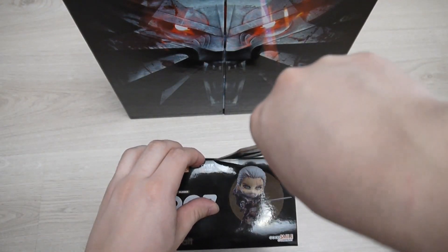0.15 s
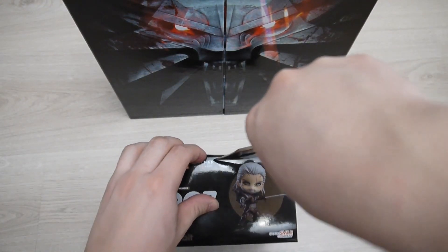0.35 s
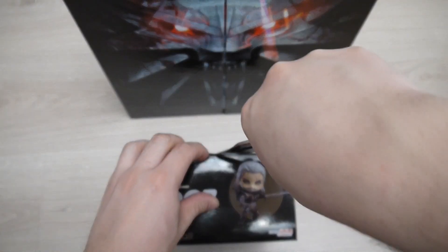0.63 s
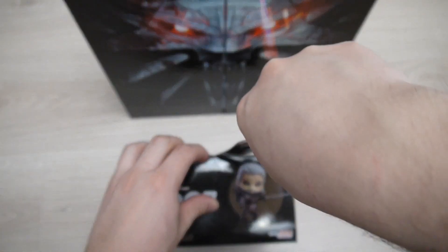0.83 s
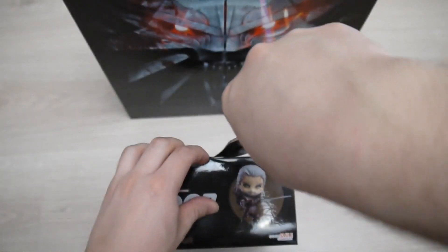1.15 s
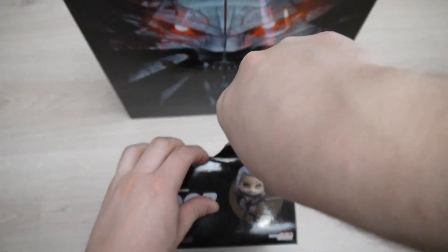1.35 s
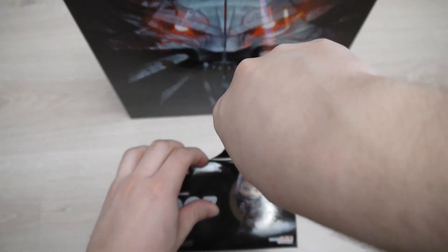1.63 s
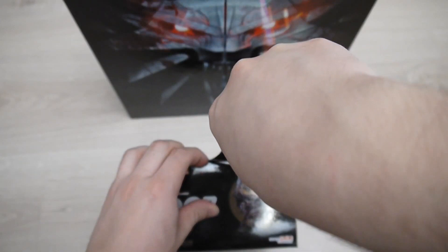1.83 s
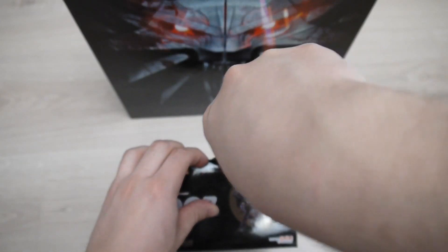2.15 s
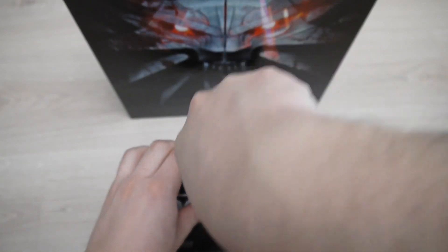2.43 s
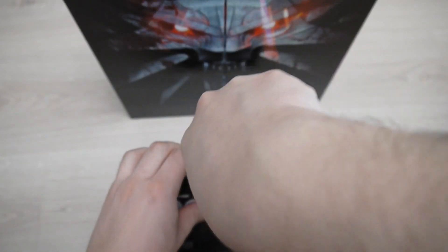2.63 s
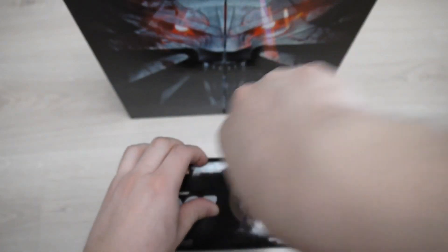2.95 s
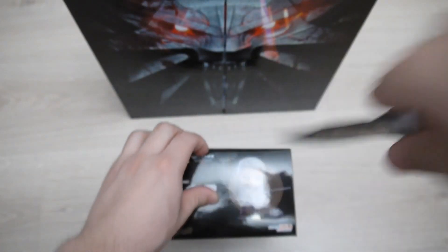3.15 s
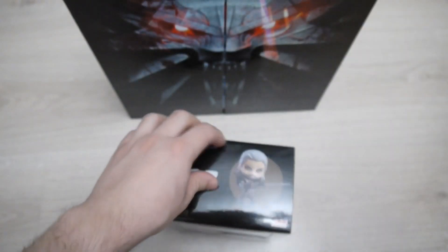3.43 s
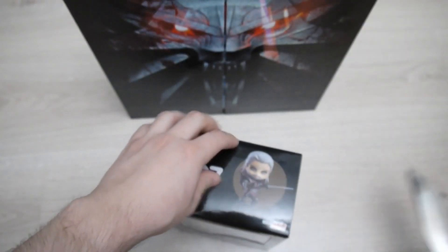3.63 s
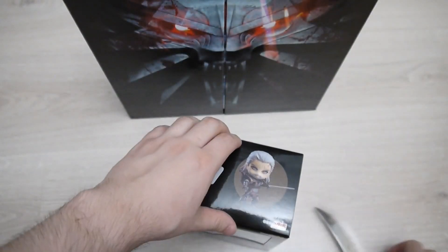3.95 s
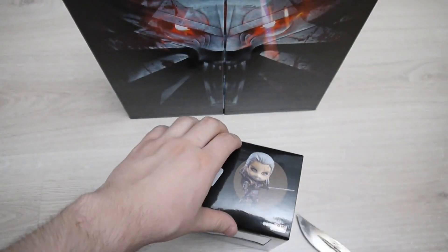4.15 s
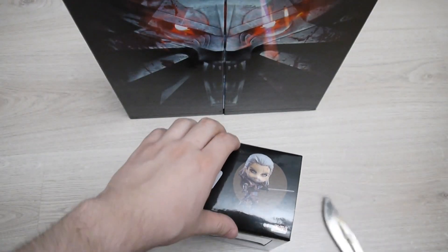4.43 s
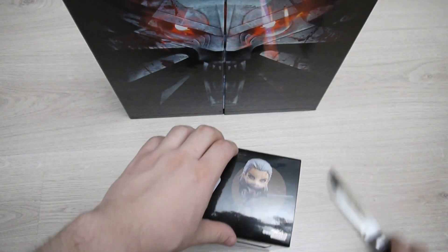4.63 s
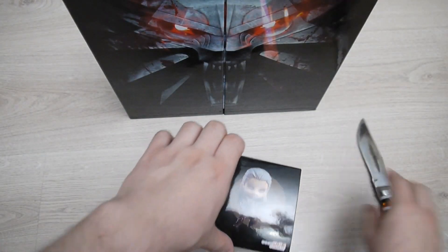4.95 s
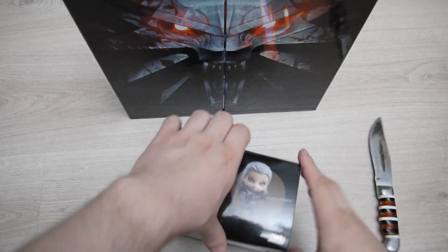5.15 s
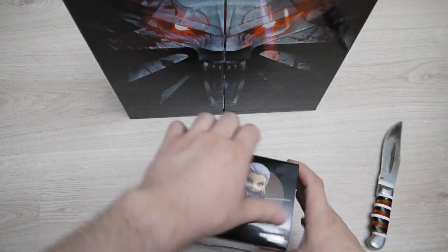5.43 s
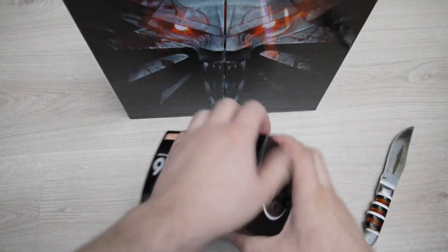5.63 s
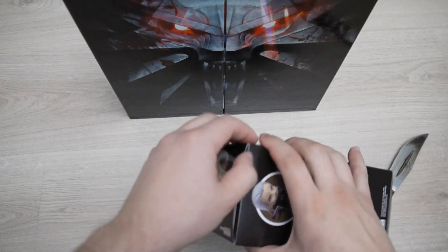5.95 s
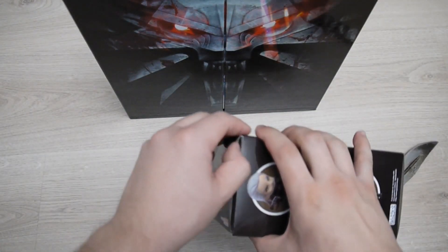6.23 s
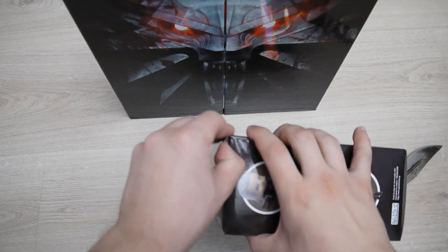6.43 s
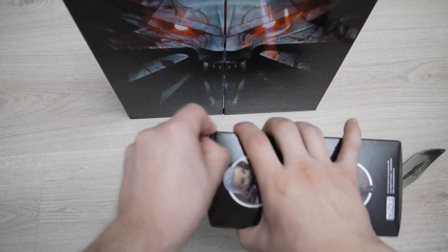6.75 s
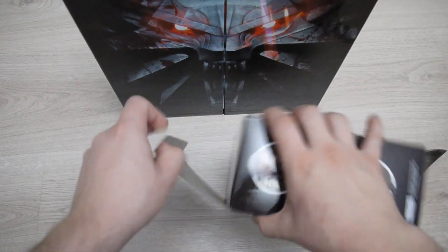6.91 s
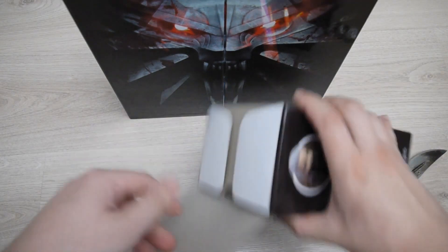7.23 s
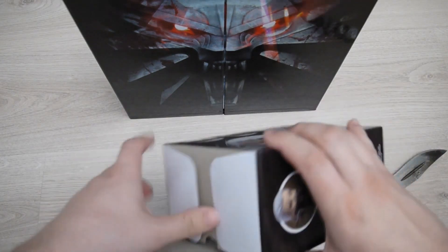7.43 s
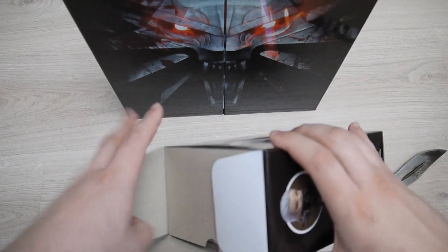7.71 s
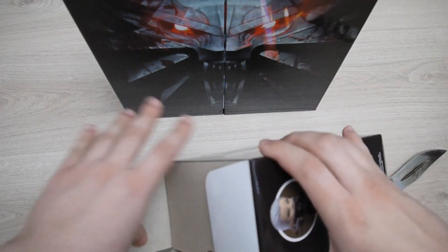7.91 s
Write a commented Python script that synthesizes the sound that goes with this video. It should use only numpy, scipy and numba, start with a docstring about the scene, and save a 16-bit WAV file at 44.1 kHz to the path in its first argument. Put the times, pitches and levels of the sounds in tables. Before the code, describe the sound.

A close stereo microphone at a table indoors, with soft steady room hush and short lively reflections. For the first two seconds there are only very faint card ticks. Around 2.4 s a crisp crackle comes from the box, then at 2.76 s a loud sharp snap as the seal gives way. Quiet card rubbing follows. From 3.75 s the knife is laid down: loud, hard wooden knocks with quick rebounds, a bright steel clink at 3.94, more rocking knocks to 4.2, weak dull bumps, then a clatter and juddering skid at 4.6-4.9 with another clink. From 5.1 to 6.6 s, light taps and papery rubs as the box is turned. At about 6.75-6.9 s the tuck flap pulls free in a loud, crackling pop. Until 8 s, hollow card taps, rasping strokes and brisk scrapes of inner flaps, strongest near 7.75.

```python
"""On a table indoors, close to a stereo microphone, a small cardboard box is opened with a knife.
The knife snaps through the seal, is laid down, rocks on its handle and is pushed aside.
Then hands turn the box, pull its tuck flap free and brush the inner flaps open.
Card and steel crackle as short bursts of noise, box, table and blade ring as decaying tones,
and rubbing is made of random tiny slips. Room echoes and a quiet hush surround it all."""
import sys
import numpy as np
from scipy import signal
from scipy.fft import rfft, irfft
from scipy.io import wavfile
from scipy.ndimage import uniform_filter1d
from numba import njit

SR = 44100
rng = np.random.default_rng(int(sys.argv[2]) if len(sys.argv) > 2 else 0)


def wav_out(sig):
    """Save sig, one row per channel (or a flat mono array), as 16-bit PCM at SR to the path in sys.argv[1]."""
    wavfile.write(sys.argv[1], SR, np.round(np.clip(np.atleast_2d(sig).T, -1, 1) * 32767).astype(np.int16))


N = 356328
TIME = np.arange(N) / SR
RING = TIME[:SR // 2]  # the half second that each blow, ring or echo may last


def amp(db):
    """Turn decibels into a gain."""
    return 10 ** (np.asarray(db) / 20)


def unit(x):
    """Scale a sound to an average (rms) strength of 1."""
    return x / np.sqrt(np.mean(x ** 2))


def lookup(points, hz):
    """Read between (f/Hz, value) points, with frequency on a logarithmic axis."""
    f, value = np.transpose(points)
    return np.interp(np.log(np.maximum(hz, 1)), np.log(f), value)


def band(x, hz, kind, order=2):
    """Keep only some of the frequencies (Butterworth filter)."""
    sections = signal.butter(order, np.minimum(hz, SR / 2 - 100), kind, fs=SR, output="sos")
    return signal.sosfilt(sections, x)


def through(x, response):
    """Let every sample of x set off the given response."""
    return signal.fftconvolve(x, response)[:len(x)]


def colour(x, points, size=2048):
    """Shape x with a (f/Hz, level/dB) spectrum, by a filter that never acts ahead of time."""
    hz = np.arange(size // 2 + 1) * SR / size
    cepstrum = irfft(np.log(amp(lookup(points, hz))))
    # folding the second half onto the first makes the filter minimum-phase
    cepstrum[1:size // 2] *= 2
    cepstrum[size // 2 + 1:] = 0
    return through(x, irfft(np.exp(rfft(cepstrum))))


def add(track, s, x):
    """Mix x into the track at time s."""
    i = int(s * SR)
    track[i:i + len(x)] += x[:N - i]


def ring(modes, stretch=1):
    """Sum of dying tones, as of a struck object; stretch above 1 makes them higher and shorter."""
    t = RING * stretch
    total = 0
    for hz, db, t60 in modes:
        fade = np.exp(-np.log(1000) * t / t60)  # down 60 dB after t60
        total = total + amp(db) * fade * np.cos(2 * np.pi * hz * t)
    return total


def walk(rate):
    """Smooth random ups and downs around 0, with rate new values a second and an rms of 1."""
    hold = int(SR / rate)
    steps = np.repeat(rng.standard_normal(N // hold + 1), hold)
    return unit(uniform_filter1d(steps, hold)[:N])


def burst(ms):
    """A cluster of tiny fractures: noise that fades to 1/e in ms milliseconds."""
    fade = np.exp(-RING * 1000 / max(ms, .2))
    x = rng.standard_normal(len(RING)) * fade
    return x * np.sqrt(np.sum(fade ** 2) / np.sum(x ** 2))


def grains(rate, spread_db):
    """Fibres that catch and slip at random, about rate a second, a few much harder than the rest."""
    size_db = spread_db * np.minimum(rng.exponential(size=N), 4)
    happens = rng.random(N) < rate / SR
    return happens * rng.choice([-1, 1], N) * amp(size_db)


def swell(strokes, db, shape=2.37):
    """Gain of hand strokes that speed up and slow down; shape 1 is a pointed swell, 2 a round one."""
    power = np.zeros(N)
    for (s, rise_s, fall_s, *_), peak_db in zip(strokes, db):
        t = np.arange(-3 * rise_s, 3 * fall_s, 1 / SR)
        side_s = np.where(t < 0, rise_s, fall_s)
        speed = np.exp(-np.abs(t / side_s) ** shape)
        add(power, s + t[0], (amp(peak_db) * speed) ** 2)
    return np.sqrt(power)


def diffuse(mid, side, wide_hz):
    """Sound from all around: alike left and right in the bass, different in the treble."""
    side = band(side, wide_hz, "highpass", order=1)
    return np.array([mid + side, mid - side])


# Tone of the background hush: (f/Hz, level/dB)
HUSH_SPECTRUM = [(15, -51), (25, -20), (129, -18.5), (144, -9.5), (193, -11.5), (260, -3), (322, -9.5),
                 (359, 0), (433, -5), (469, -1.5), (666, -10), (1110, -7.5), (1530, -13), (9810, -22.5),
                 (15500, -30.5)]


def background(level_db=-55.5, wide_hz=1500, side_db=3):
    """Quiet, even room noise and microphone hiss, made of steady filtered noise."""
    mid, side = (unit(colour(rng.standard_normal(N), HUSH_SPECTRUM)) for _ in range(2))
    return amp(level_db) * diffuse(mid, amp(side_db) * side, wide_hz)


# Snaps of the seal, finger taps and flaps that catch:
# (t/s, snap level/dB, panel thump level/dB against the snap, crisp edge level/dB against the snap,
#  panel pitch f/Hz, where 335 leaves the box tones as listed)
BOX_TAPS = [(0.406, -44.5, -17, -4, 370), (1.199, -51, -2.5, -10, 370), (1.603, -39, 4, -5, 900),
            (1.609, -41, 2, -1, 439), (1.815, -37.5, -1.5, -4, 515), (2.382, -20.5, -16.5, -3, 315),
            (2.399, -31, -10.5, 7, 348), (2.456, -42, -12, 11, 340), (2.762, -8, -14.5, -5.5, 1014),
            (2.765, -19, -2, -25, 343), (3.255, -44, -4.5, -9, 440), (3.437, -44, -8, -10, 366),
            (3.542, -40, -6, -3, 290), (5.08, -24, -12.5, 0, 282), (5.259, -47.5, 14.5, -9, 786),
            (5.316, -35, -8, -2, 378), (5.513, -31, -8, 3.5, 317), (5.549, -39.5, 9.5, -9.5, 946),
            (5.785, -50.5, 5, 2, 527), (5.97, -40.5, -6.5, -8, 373), (6.209, -38.5, -10, -0.5, 363),
            (6.431, -45, -9, 2, 335), (6.525, -34, -18, -3, 310), (6.747, -17.5, -20, 5.5, 337),
            (6.768, -17.5, -8, 1, 342), (6.794, -9, 5, 1, 2525), (6.798, -21, -1, -6, 873),
            (6.832, -24.5, -1, 2.5, 950), (6.872, -20.5, -11, -21, 349), (6.974, -28.5, -5, -7, 890),
            (7.221, -25.5, -4.5, -9, 797), (7.231, -30.5, -3, 5.5, 926), (7.265, -22.5, -2, -22, 960),
            (7.522, -22.5, -12, -3, 420), (7.823, -22.5, -19, -2.5, 682), (7.882, -33, -14.5, -23, 377),
            (8.033, -19, -9, 0, 482)]
# Tones of the box panels and the air inside, before each tap shifts them: (f/Hz, level/dB, 60 dB decay t/s)
BOX_TONES = [(291, 5, 0.066), (313.4, 4.5, 0.095), (376.8, 5, 0.088), (448.4, -8, 0.14), (520, -27, 0.1),
             (584, -10.5, 0.12), (870, -45, .04), (1020, -32, .06)]
# Tone of cracking card: (f/Hz, level/dB)
CARD_SPECTRUM = [(150, -5), (300, 13), (600, 8), (1000, 8.5), (1600, 8), (2000, 3.5), (2500, 7), (3500, 7),
                 (6000, 4.5), (10000, -6), (15000, -19)]


def box_taps(panel_hz=335, edge_hz=3500, snap_ms=3.78, bend_s=0.00089):
    """Each snap crackles briefly and makes the panels boom; a stiffer spot rings higher and shorter."""
    out = np.zeros(N)
    for s, snap_db, thump_db, edge_db, hz in BOX_TAPS:
        # the card bends a moment before most of its fibres crack
        crack = colour(burst(snap_ms) * (1 - np.exp(-RING / bend_s)), CARD_SPECTRUM)
        body = band(band(crack, 150, "highpass"), edge_hz, "lowpass")
        edge = band(crack, edge_hz, "highpass", order=3)
        boom = ring(BOX_TONES, hz / panel_hz) * (1 - np.exp(-RING / 0.0031))
        thump = band(boom, 261, "highpass", order=3)
        add(out, s, amp(snap_db) * (body + amp(edge_db) * edge + amp(thump_db) * thump))
    return out


@njit
def resonate(x, hz, width):
    """A resonance whose pitch can move; width is a share of its centre frequency."""
    y, b, l = np.empty(len(x)), 0., 0.  # b and l are the filter's two memories
    for i in range(len(x)):
        g = np.tan(np.pi * hz[i] / SR)
        v = (b + g * (x[i] - l)) / (1 + g * (g + width))
        b, l, y[i] = 2 * v - b, l + 2 * g * v, width * v
    return y


# Strokes of card under the fingers or against itself:
# (t/s at the fastest, rise t/s, fall t/s, rub level/dB, panel rumble level/dB against the rub,
#  hiss level/dB against the rub, lowest flap resonance f/Hz before it wanders)
CARD_STROKES = [(2.45, 0.045, 0.036, -48.5, -2, -1, 2340), (2.625, 0.043, 0.046, -52, -2, -3, 1740),
                (2.752, 0.028, 0.023, -46.5, -8, -4, 2700), (2.937, 0.06, .035, -48, -14, -5, 2330),
                (3.392, 0.063, 0.097, -65, 2.5, 7, 1400), (3.437, 0.01, .012, -49.5, 5.5, -13, 920),
                (3.63, 0.1, 0.43, -54, 0, -6.5, 1120), (5.19, 0.064, 0.08, -51.5, 3, -2, 1050),
                (5.345, 0.023, 0.038, -51, 5.5, -3, 1030), (5.45, 0.08, 0.12, -53, 5, 1, 1090),
                (5.53, 0.043, 0.042, -43, -2.5, -5.5, 1080), (5.862, 0.018, 0.025, -48, 0.5, -2.5, 1260),
                (5.993, 0.018, 0.024, -51.5, 0, -14, 1240), (5.62, 0.066, 0.14, -57, 2, -4, 1000),
                (6.4, .45, .45, -64.5, 10, 1, 1110), (6.451, 0.027, 0.018, -45.5, -9, -11, 1040),
                (6.53, 0.055, 0.028, -58, 8, -1, 1410), (6.774, 0.027, 0.02, -25.5, -9, 1.5, 1470),
                (6.84, 0.017, 0.08, -37, 0, -5.5, 1160), (7.012, 0.077, 0.082, -38.5, -3, -6, 980),
                (7.19, 0.041, 0.12, -47, 1.5, -2, 990), (7.277, 0.0096, 0.033, -35.5, 1, -5, 955),
                (7.345, 0.045, 0.036, -38.5, -3, -8, 1050), (7.38, 0.0099, 0.049, -39, -7, 5.5, 2100),
                (7.444, 0.034, 0.02, -39, -3, -12, 1940), (7.519, 0.028, 0.022, -38.5, -12, -2.5, 1850),
                (7.62, 0.067, 0.19, -49, -3.5, -1, 1460), (7.722, 0.014, 0.023, -33, -21, -4, 2170),
                (7.753, 0.022, .026, -27.5, -6, -5.5, 2190), (7.823, 0.018, 0.032, -42, -16, -4, 1290),
                (8.005, 0.048, 0.027, -42.5, -10, 0.5, 1530), (8.05, 0.044, 0.049, -44.5, -2, 2, 1130)]
# Tone of sliding card: (f/Hz, level/dB)
SLIDE_SPECTRUM = [(88, -50), (150, -5.5), (326, -7), (420, -8.5), (471, -4.5), (643, -9.5), (948, -10.5),
                  (1630, -11.5), (1760, -18), (2100, -15), (2500, -13), (4650, -19), (5650, -23),
                  (11400, -29), (15500, -39)]
# Resonances of a flap: (multiple of the lowest f, width as a share of the centre f, level/dB)
FLAP_RESONANCES = [(1, .12, 9), (1.6, .15, 0.5), (2.4, .3, -2.5)]


def box_rubs(split_hz=3500, body_hz=700, flutter_db=3.0, flap_db=2, flap_wander=0.075):
    """Uneven friction of card: a rumble from the panels, a rasp and a fine hiss."""
    s, _, _, rub_db, rumble_db, hiss_db, flap_hz = np.transpose(CARD_STROKES)
    slip = grains(rate=3200, spread_db=2) * amp(flutter_db * walk(rate=110))
    slip = colour(slip, SLIDE_SPECTRUM)
    # the free length of the flap changes as it bends, and its resonance with it
    hz = np.interp(TIME, s, flap_hz) * np.exp(flap_wander * walk(rate=30))
    flap = sum(amp(db) * resonate(slip, ratio * hz, 1. * width) for ratio, width, db in FLAP_RESONANCES)
    middle = unit(band(slip, [body_hz, split_hz], "bandpass", order=3))
    rasp = unit(middle + amp(flap_db) * unit(flap))
    hiss = unit(band(slip, split_hz, "highpass", order=3))
    rumble = unit(band(slip, [260, body_hz], "bandpass", order=3))
    out = rasp * swell(CARD_STROKES, rub_db)
    out += rumble * swell(CARD_STROKES, rub_db + rumble_db)
    return out + hiss * swell(CARD_STROKES, rub_db + hiss_db)


def box_crinkles(rate=70, spread_db=2, level_db=-10, tick_s=0.0028):
    """While the card is worked, its creases give way in small random ticks."""
    bumps = through(grains(rate, spread_db), np.exp(-RING / tick_s))
    ticks = colour(bumps * rng.standard_normal(N), CARD_SPECTRUM)
    return amp(level_db) * unit(ticks) * swell(CARD_STROKES, np.transpose(CARD_STROKES)[3])


# Tones of the table top: (f/Hz, level/dB, 60 dB decay t/s)
TABLE_TONES = [(187, -17, 0.43), (280, -26, 0.8), (339, -8, 0.22), (406.4, -8.5, 0.31), (466, 3, 0.17),
               (454, -20.5, 0.92), (524.6, -7, 0.48), (586, 11, 0.057), (645, 6, 0.04), (693, 2, 0.2),
               (686, 11, 0.16), (776, 0.5, 0.28), (780, -10, 0.38), (890, -50, 0.45), (945, -2, 0.26),
               (960, -19, 0.29), (1065, -5, 0.28), (1212, -9, 0.32), (1306, -6, 0.21), (1460, -15, 0.51),
               (1500, -38, 0.35)]


def table_top(ring_db, low_hz=540, high_hz=920, radiate_hz=260):
    """A blow gives a few strong swings near the contact; the whole board then rings on."""
    thud = band(signal.unit_impulse(len(RING)), [low_hz, high_hz], "bandpass")
    board = ring(TABLE_TONES) * (1 - np.exp(-RING / 0.00094))
    motion = thud / np.abs(thud).max() + amp(ring_db) * board
    # a board hardly radiates its slowest bending
    return band(motion, radiate_hz, "highpass")


# The knife handle knocks on the table:
# (t/s, thud level/dB, contact cut-off f/Hz, hard clack level/dB, loss per rebound level/dB, sign ignored)
HANDLE_KNOCKS = [(3.752, 1.5, 1800, -4, 30), (3.7862, -0.5, 1590, 0.5, 19), (3.9315, 3, 880, -17, 14.5),
                 (3.9423, -27, 1200, -9, -2), (4.0274, -2.5, 2010, -8, 16), (4.061, -8.5, 1000, -19, 9),
                 (4.116, -12.5, 1000, -26, 3.5), (4.198, -15, 650, -31.5, 4.5), (4.407, -17.5, 330, -44, 0),
                 (4.473, -16, 500, -47, 2.5), (4.533, -21, 1100, -42, 14), (4.577, -12.5, 900, -28, -0.5),
                 (4.666, -3.5, 1170, -26, 16), (4.694, -15, 800, -23, 20), (4.851, -10, 1200, -33, 13)]
# Tone of the hard clack: (f/Hz, level/dB)
CLACK_SPECTRUM = [(120, -60), (300, -44), (900, -5), (1500, 9.5), (2200, -0.5), (3000, -0.5), (4200, 4),
                  (6500, -6.5), (9000, -14), (15000, -29.5)]


def knife_knocks(board, count=3, gap_s=.011, gap_ratio=0.99, jitter=.15):
    """The handle lands and rebounds at uneven gaps, mostly weaker; softer contacts are duller."""
    out = np.zeros(N)
    for s, thud_db, contact_hz, clack_db, loss_db in HANDLE_KNOCKS:
        thud = amp(thud_db) * band(board, contact_hz, "lowpass", order=1)
        for k in range(count):
            clack = amp(clack_db) * colour(burst(ms=1.62), CLACK_SPECTRUM)
            add(out, s, amp(-k * abs(loss_db)) * (thud + clack))
            s += gap_s * gap_ratio ** k * np.exp(jitter * rng.standard_normal())
    return out


# The knife skids over the table:
# (t/s at the fastest, rise t/s, fall t/s, rattle level/dB, scrape level/dB)
KNIFE_SKIDS = [(3.86, 0.062, 0.13, -29, -34), (4.08, 0.022, 0.063, -27, -42),
               (4.419, 0.012, 0.022, -33.5, -56), (4.482, 0.013, 0.013, -33.5, -50),
               (4.597, 0.085, 0.18, -30, -36.5), (4.661, 0.042, 0.068, -16, -43),
               (4.768, 0.03, .028, -16, -38.5), (4.849, 0.036, 0.024, -29, -43)]
# Tone of the metal scrape: (f/Hz, level/dB)
SCRAPE_SPECTRUM = [(120, -11), (300, 17), (600, 6), (1400, 14.5), (2100, 6.5), (3000, 6), (4500, 4),
                   (6500, 0), (9000, -4.5), (12000, -15), (15000, -23)]


def knife_skids(board, slip_hz=210, jitter=.6, scatter_db=2, contact_hz=1050):
    """The ribbed handle judders over the table in uneven slips while its metal scrapes."""
    rattle_db, scrape_db = np.transpose(KNIFE_SKIDS)[3:]
    chance = rng.standard_normal((2000, 2))  # one row a slip: its gap and its strength
    gaps_s = np.exp(jitter * chance[:, 0]) / slip_hz
    when = (np.cumsum(gaps_s) * SR).astype(int)
    slips = np.zeros(N)
    slips[when[when < N]] = amp(scatter_db * chance[when < N, 1])
    force = swell(KNIFE_SKIDS, rattle_db)
    rattle = through(band(slips * force, contact_hz, "lowpass"), board)
    rattle = unit(rattle) * np.sqrt(np.mean(force ** 2))
    scrape = unit(colour(grains(rate=3200, spread_db=1.5), SCRAPE_SPECTRUM))
    return rattle + scrape * swell(KNIFE_SKIDS, scrape_db)


# The steel blade clinks: (t/s, tick level/dB, ring level/dB, tick fade t/ms)
BLADE_CLINKS = [(3.942, 2, -36.5, 3.35), (4.6551, .5, -42.5, 1.74), (4.888, -17, -49, 9.2)]
# Tones of the blade: (f/Hz, level/dB, 60 dB decay t/s)
BLADE_TONES = [(3710, -22.5, 0.14), (4300, 1, .11), (4190, 18.5, 0.094), (4670, -17, 0.15),
               (5540, 23, 0.031), (6000, -13, .1), (6850, 1, .2), (7300, 8.5, .16), (7600, 3.5, 0.2),
               (9300, -17, .2)]
# Tone of the steel tick: (f/Hz, level/dB)
STEEL_SPECTRUM = [(200, -51), (500, -16), (1800, -6), (3200, -6.5), (4100, -7.5), (4800, -7), (5600, -3.5),
                  (6700, -6), (7800, -7), (9500, -5), (11500, -16), (15000, -23)]


def blade_clinks(buzz=0.71):
    """Steel strikes with a bright tick and a thin ring that buzzes against the table."""
    out = np.zeros(N)
    for s, tick_db, ring_db, ms in BLADE_CLINKS:
        buzzing = ring(BLADE_TONES) * (1 - buzz + buzz * walk(rate=460)[:len(RING)])
        tick = colour(burst(ms), STEEL_SPECTRUM)
        add(out, s, amp(tick_db) * tick + amp(ring_db) * buzzing)
    return out


# How long the room rings on: (f/Hz, 60 dB decay t/s)
ROOM_DECAY = [(150, 0.37), (400, 0.43), (1000, 0.32), (3000, 0.48), (7000, 0.39), (14000, 0.14)]


def reflections(early_db=-8, tail_db=-8, early_s=0.0068):
    """Quick reflections from the table and nearby things, then the short tail of the room."""
    noise, near = rng.standard_normal((2, len(RING)))
    tail = np.zeros(len(RING))
    for f in 110 * 2. ** np.arange(8):  # one octave at a time, each with its own decay
        fade = np.exp(-np.log(1000) * RING / lookup(ROOM_DECAY, f * np.sqrt(2)))
        tail += band(noise, [f, 2 * f], "bandpass", order=3) * fade
    tail = tail * (1 - np.exp(-RING / 0.0021))
    # small things nearby throw back mostly the short waves
    early = band(near, 900, "highpass", order=1) * np.exp(-RING / early_s) * (RING > .001)
    return (amp(tail_db) * unit(tail) + amp(early_db) * unit(early)) / np.sqrt(len(RING))


def room(dry, moves_hz=2.2, wide_hz=1300, side_db=0.0):
    """Hands and box keep moving, so the sound keeps turning between two patterns of reflections."""
    turn = 2 * np.pi * moves_hz * TIME

    def shifting():
        first = through(dry * np.cos(turn), reflections())
        return first + through(dry * np.sin(turn), reflections())

    mid, side = shifting(), shifting()
    return diffuse(mid, amp(side_db) * side, wide_hz)


def place(x, pan_db):
    """Put a near source left (positive) or right; pan_db is the left minus right level."""
    return x * amp(np.array([[pan_db], [-pan_db]]) / 2)


def scene():
    """Knife and box lie on the table just in front of the microphone."""
    box = box_taps() + box_rubs() + box_crinkles()
    wood = knife_knocks(table_top(ring_db=-23)) + knife_skids(table_top(ring_db=-14.5))
    steel = blade_clinks()
    # the table's boom is heard mostly direct; its sharp clacks fill the room
    spread = wood - 0.39 * band(wood, 970, "lowpass", order=1)
    direct = place(wood, -2.0) + place(steel, 1.6) + place(box, -0.9)
    echoes = room(spread + amp(-1.0) * steel + amp(-0.5) * box)
    return direct + echoes + background()


def record(dry, top_hz=15900):
    """The pickup rounds the loudest peaks, turns the deep bass far down and drops the highest treble."""
    x = .88 * dry / (1 + dry ** 6) ** (1 / 6)
    x = band(x, 140, "highpass", order=4) + amp(-22) * band(x, 110, "lowpass")
    return signal.sosfilt(signal.ellip(10, .2, 80, top_hz, fs=SR, output="sos"), x)


dry = scene()
out = record(dry)
wav_out(out)
```